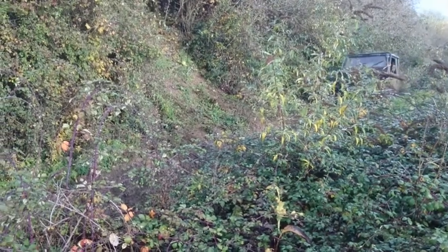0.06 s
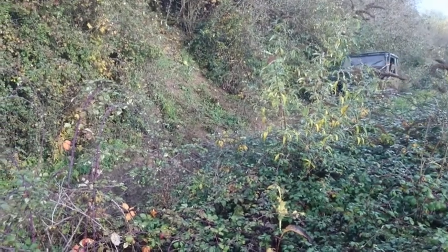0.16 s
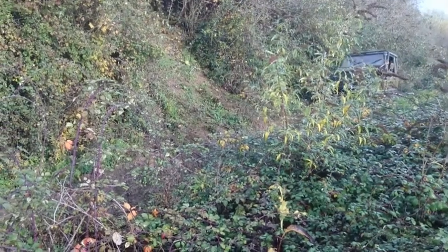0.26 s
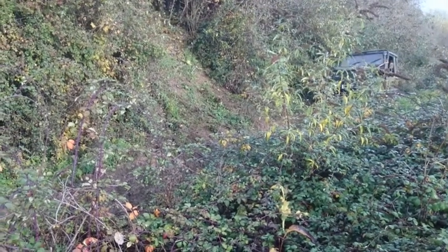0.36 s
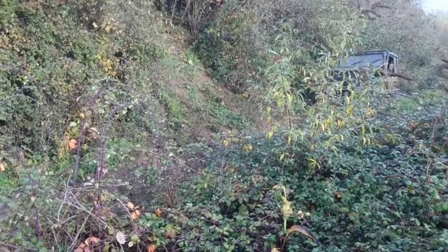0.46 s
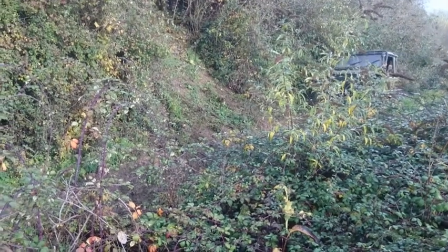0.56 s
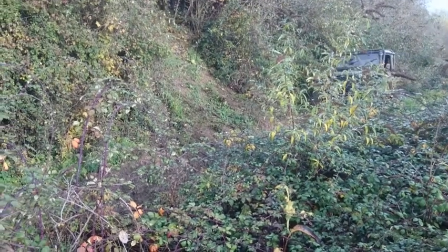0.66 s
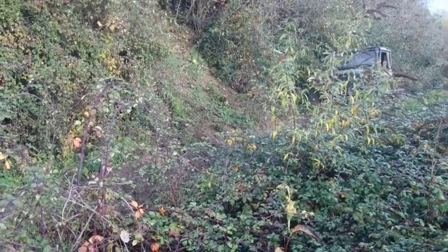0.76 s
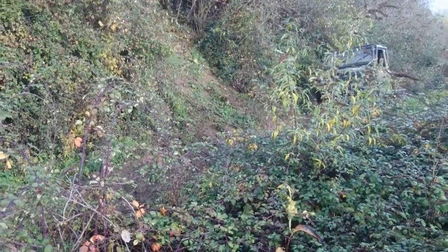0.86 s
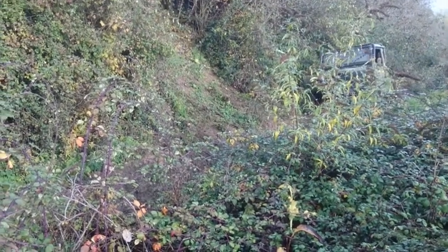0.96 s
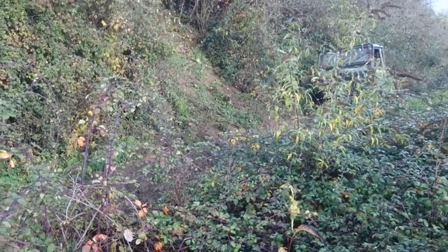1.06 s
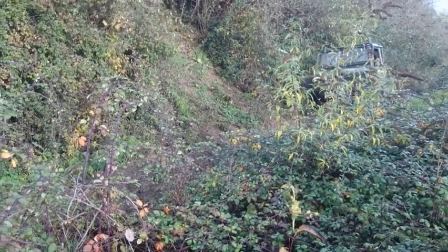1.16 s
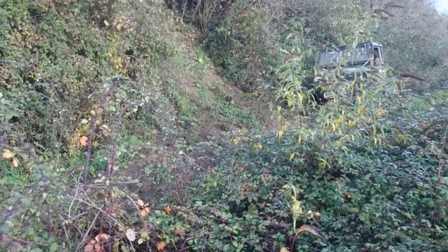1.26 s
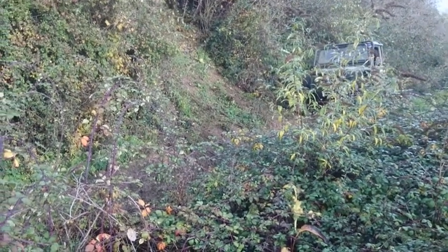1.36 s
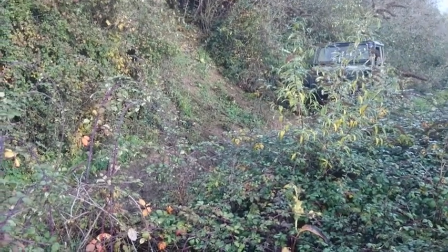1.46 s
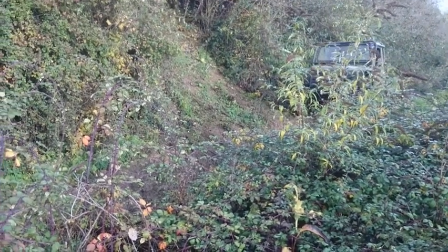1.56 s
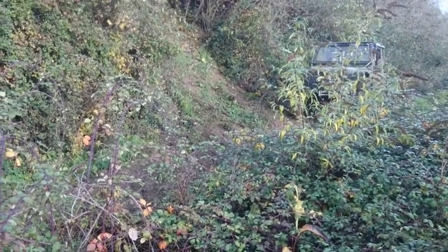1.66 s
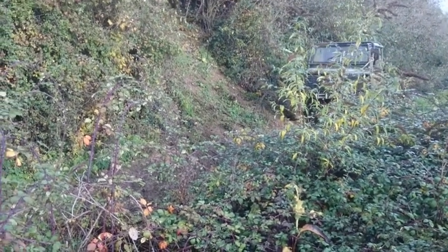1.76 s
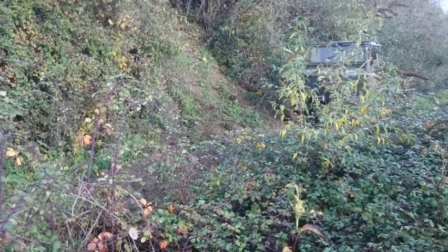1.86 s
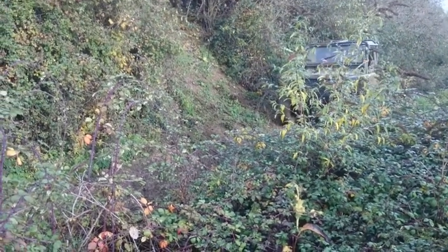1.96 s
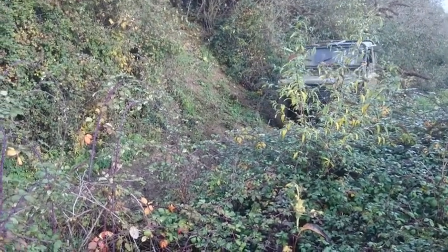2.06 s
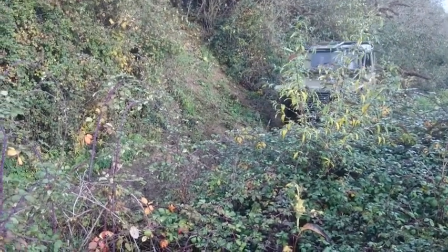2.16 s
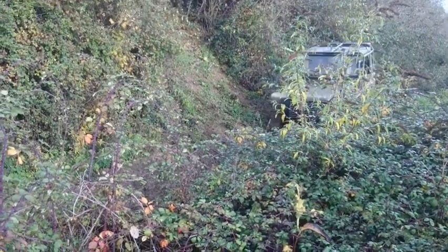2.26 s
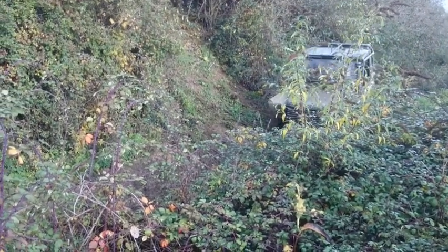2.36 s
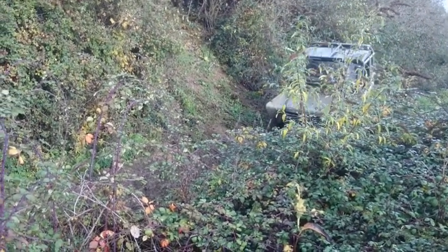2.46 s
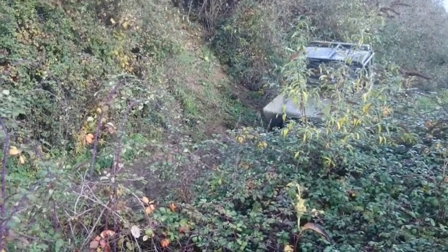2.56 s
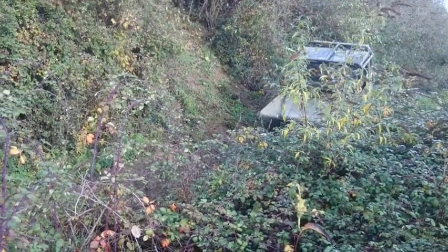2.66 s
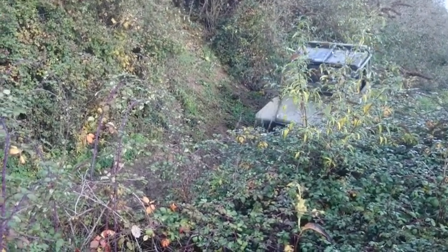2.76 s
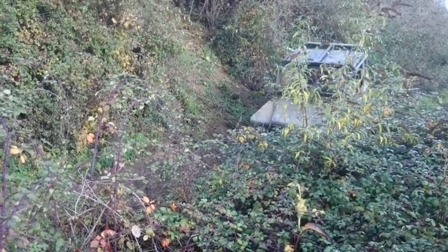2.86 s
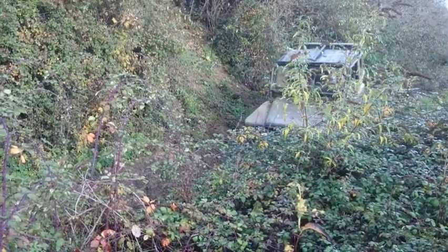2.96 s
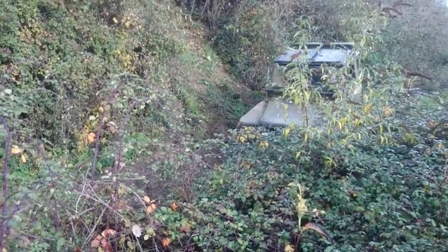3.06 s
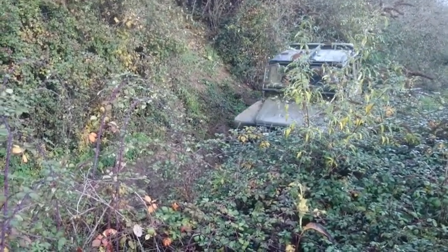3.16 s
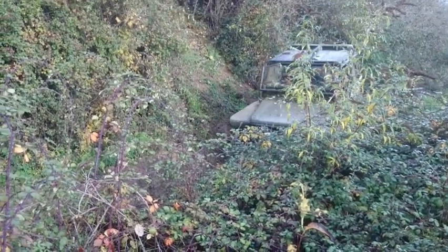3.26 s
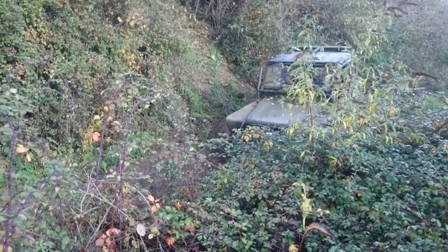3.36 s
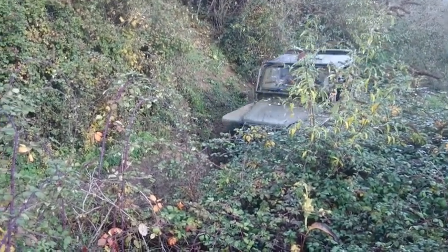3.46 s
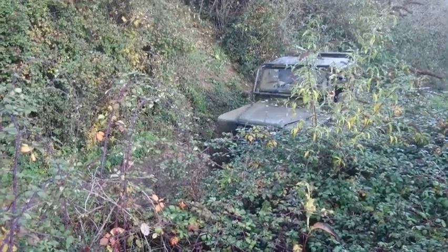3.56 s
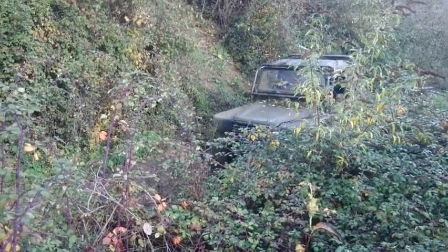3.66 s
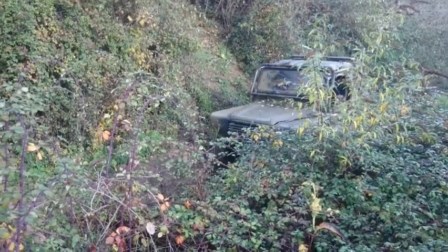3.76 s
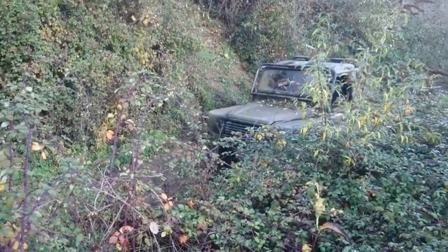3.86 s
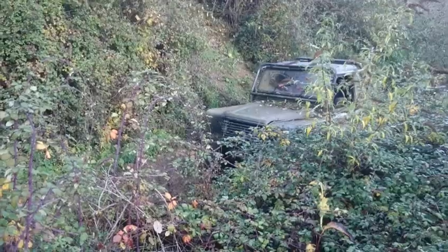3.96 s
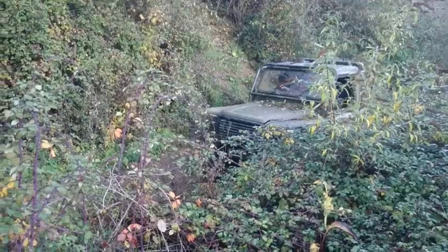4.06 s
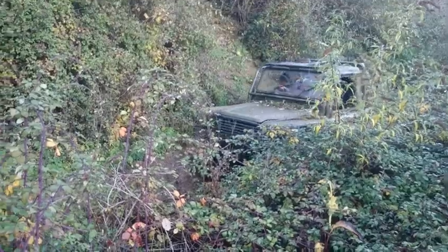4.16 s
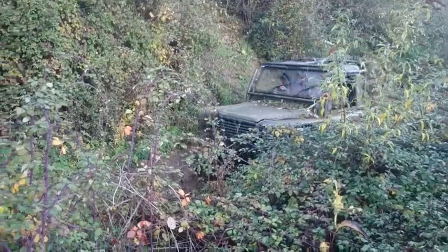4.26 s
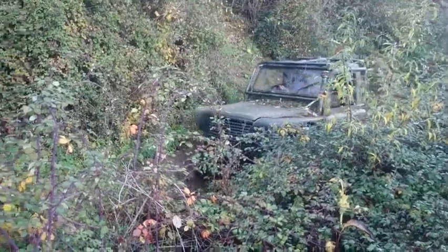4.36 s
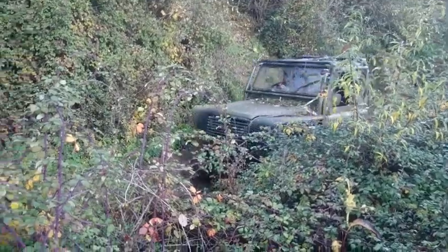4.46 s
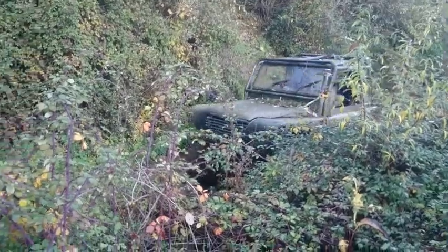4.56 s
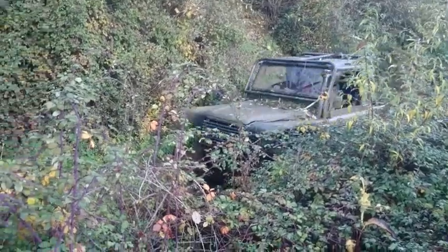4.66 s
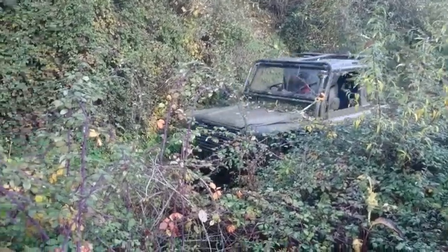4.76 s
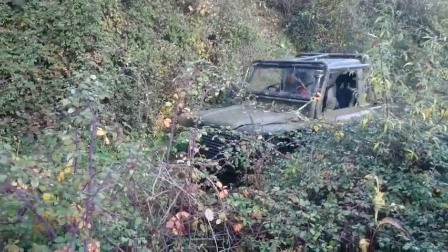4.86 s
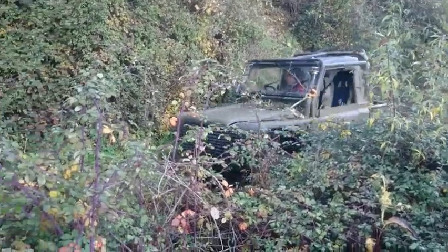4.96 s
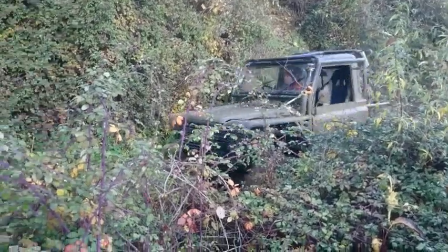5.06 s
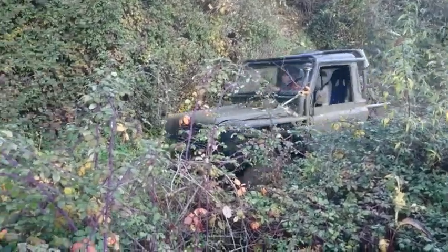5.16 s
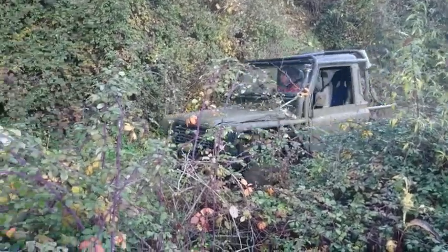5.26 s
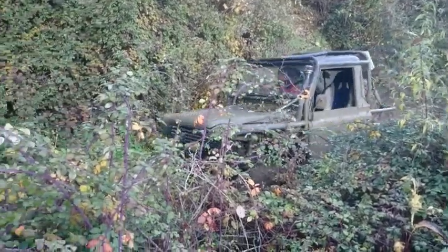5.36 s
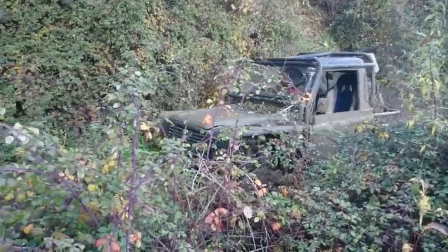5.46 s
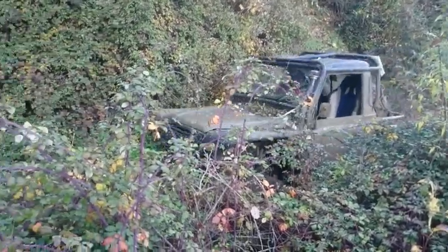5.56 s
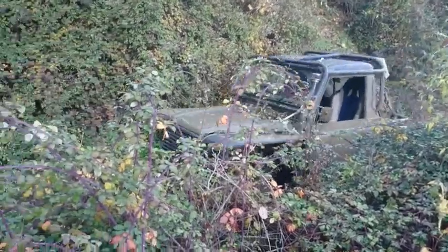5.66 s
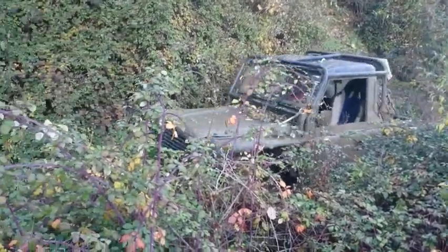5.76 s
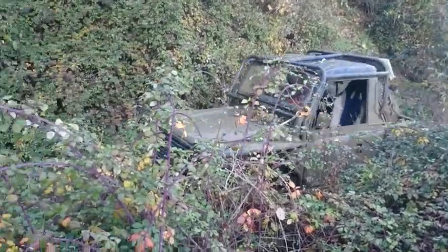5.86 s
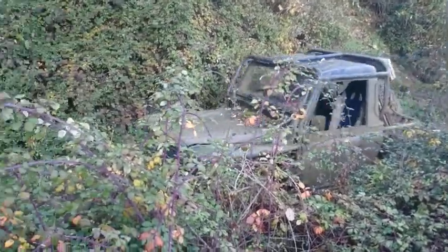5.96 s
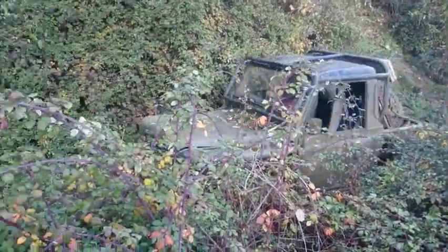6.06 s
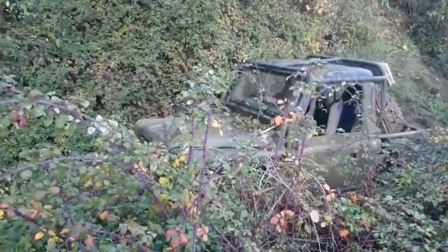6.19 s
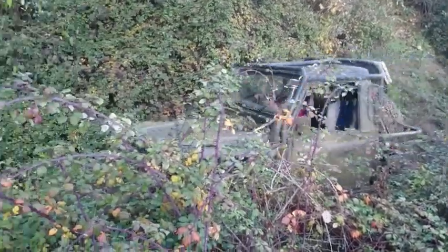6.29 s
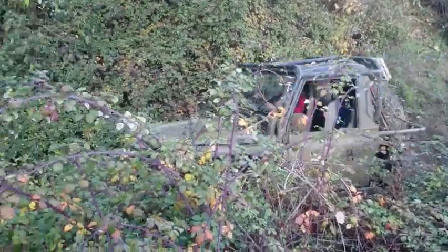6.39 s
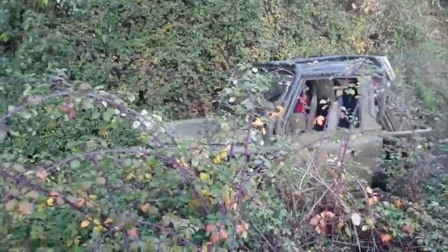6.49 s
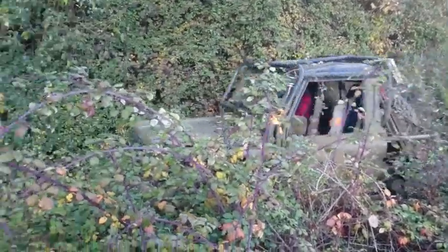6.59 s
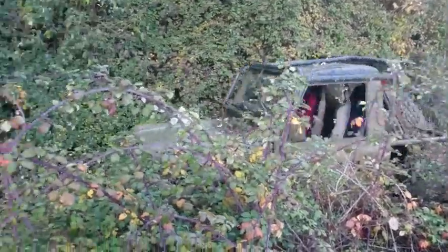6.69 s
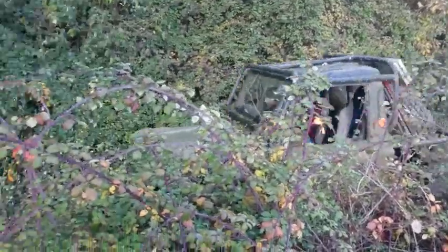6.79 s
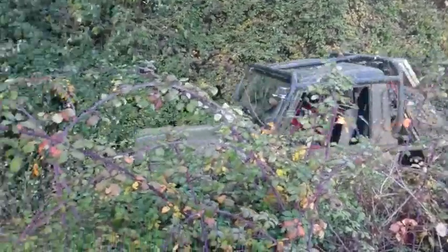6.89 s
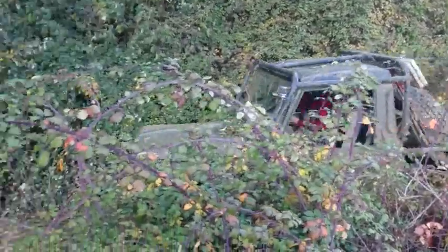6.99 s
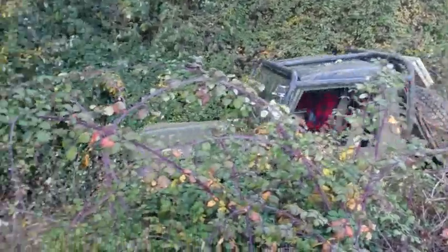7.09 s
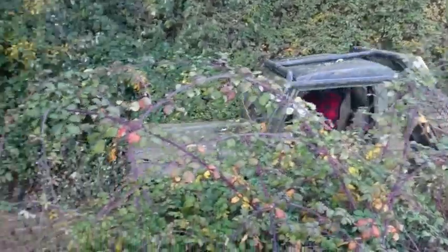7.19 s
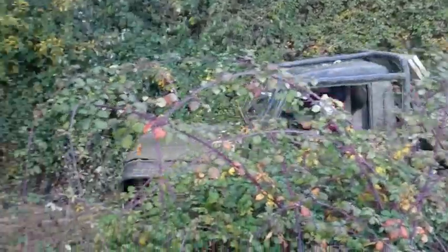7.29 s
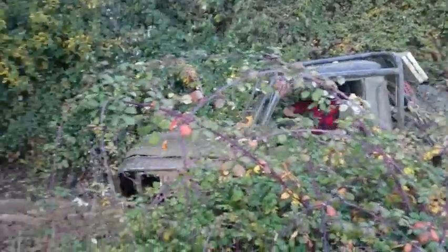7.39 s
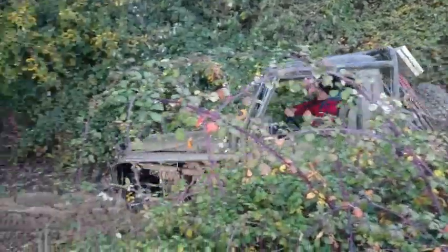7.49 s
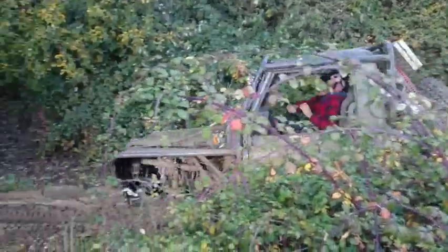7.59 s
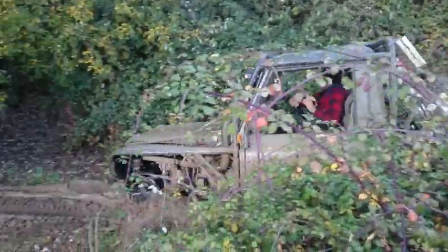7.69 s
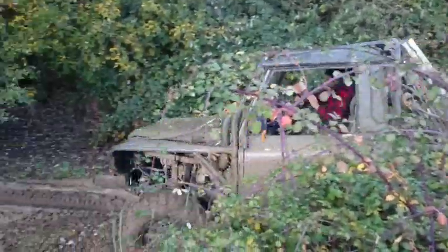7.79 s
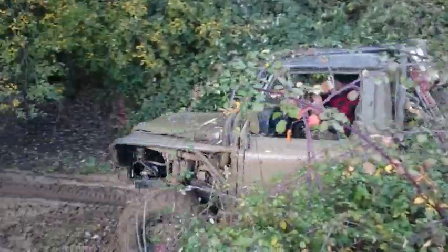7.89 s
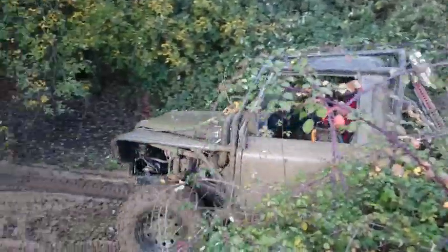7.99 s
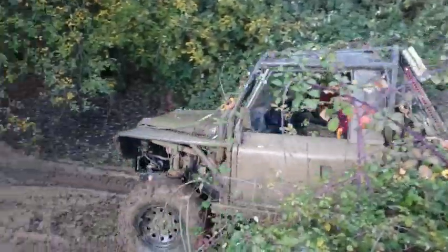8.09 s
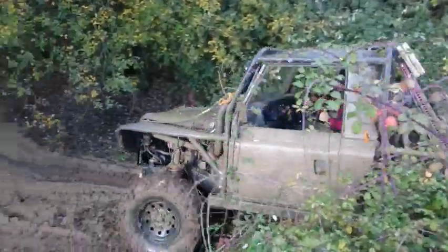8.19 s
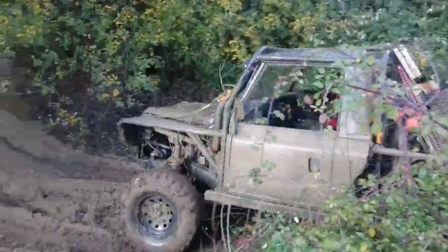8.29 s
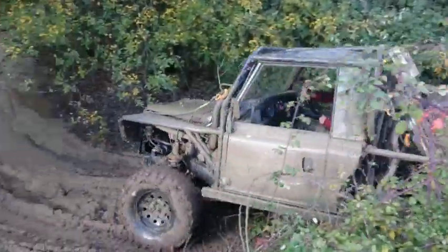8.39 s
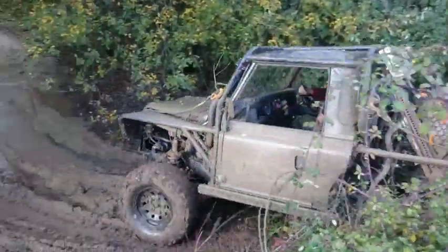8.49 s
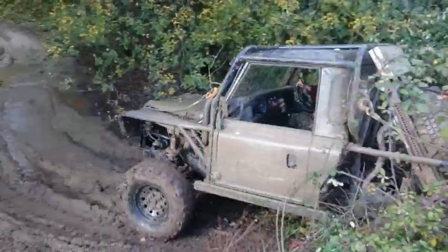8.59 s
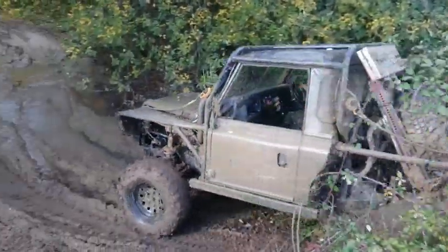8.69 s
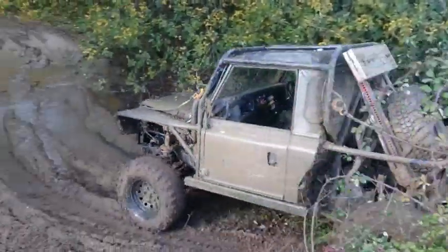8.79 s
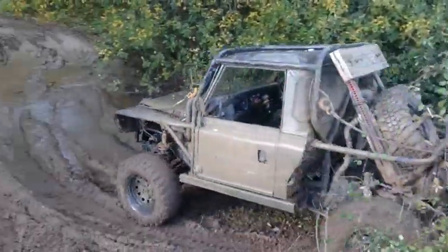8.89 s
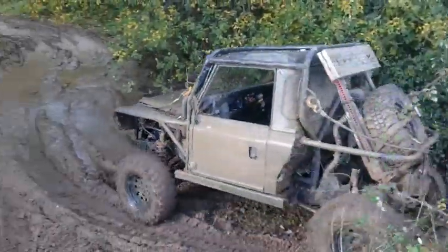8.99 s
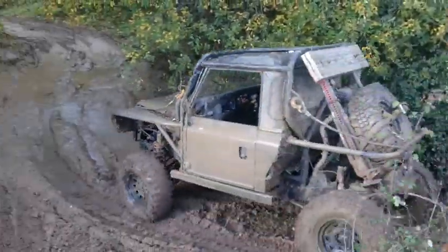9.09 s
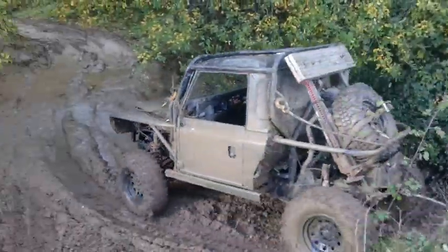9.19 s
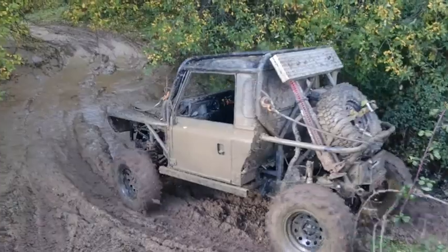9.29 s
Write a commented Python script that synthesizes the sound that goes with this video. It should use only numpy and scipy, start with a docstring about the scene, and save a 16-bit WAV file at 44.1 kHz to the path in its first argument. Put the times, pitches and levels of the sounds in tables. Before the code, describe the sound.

An off-road truck crawls through mud and bushes outdoors, its diesel engine clattering and humming. The engine eases off, then knocks harder as it comes closer and speeds up. Leaves hiss along the body and tyres rumble low under a faint gear whine. Brief high squeaks and sharp cracks break in, the two loudest cracks landing with chassis thuds in the second half. The truck ends close to the microphone, at its loudest.

```python
"""A clattering, humming diesel engine comes first: an off-road truck crawls closer through brush and
mud, then turns its side to us. Burning fuel knocks in the cylinders and rings the engine block,
the exhaust puffs, gears whine and the turbo hisses. Tyres rumble, leaves brush the body and the
chassis thuds, among sharp cracks, small ringing knocks and thin, high squeaks. Two close microphone
openings (ports) hear the bass in opposite phase: one wave rises as the other falls."""
import sys
import numpy as np
from scipy import signal
from scipy.fft import rfft, irfft, next_fast_len
from scipy.io import wavfile
from scipy.ndimage import uniform_filter1d

SR = 44100
rng = np.random.default_rng(int(sys.argv[2]) if len(sys.argv) > 2 else 0)


def int16_out(signal):
    """Quantize to a 16-bit WAV file."""
    q = np.round(np.clip(np.atleast_2d(signal).T, -1, 1) * 32767)
    wavfile.write(sys.argv[1], SR, q.astype(np.int16))


N = 411894
T = np.arange(N) / SR
SIZE = next_fast_len(N)
HZ = np.maximum(np.fft.rfftfreq(SIZE, 1 / SR), 1)


def undb(db):
    return 10 ** (np.asarray(db) / 20)


def unit(x):
    return x / np.sqrt(np.mean(x ** 2))


def curves(table):
    """Join a table's points in time: one curve for each value column."""
    times, *columns = np.transpose(table)
    return [np.interp(T, times, column) for column in columns]


def over_hz(table):
    """Join a table's points from low to high frequency."""
    hz, value = np.transpose(table)
    return np.interp(np.log(HZ), np.log(hz), value)


def shape(x, gain):
    """Filter a sound: give each frequency its own gain."""
    return irfft(rfft(x, SIZE) * gain, SIZE)[..., :N]


def hiss(gain):
    """Two unrelated noises with the same tone colour."""
    return unit(shape(rng.standard_normal((2, N)), gain))


def band(low_hz, high_hz):
    return 1 / np.sqrt((1 + (low_hz / HZ) ** 6) * (1 + (HZ / high_hz) ** 6))


def resonances(modes):
    """A filter that rings like a struck object."""
    return sum(undb(db) / (1 + 1j * (HZ - hz) / (width / 2)) for hz, width, db in modes)


def wander(rate):
    """A smooth random curve, roughly -1 to 1, with `rate` new values a second."""
    hold = int(SR / rate)
    steps = np.repeat(rng.standard_normal(N // hold + 1), hold)
    return 1.18 * uniform_filter1d(uniform_filter1d(steps, hold), hold)[:N]


def strike(start, rise, fade):
    """Loudness of a hit: a quick rise, then a fall of 60 dB every `fade` seconds."""
    swell, i = np.zeros(N), int(start * SR)
    t = np.arange(min(int(1.5 * fade * SR), N - i)) / SR
    swell[i:i + len(t)] = (1 - np.exp(-t / rise)) * np.exp(-np.log(1000) * t / fade)
    return swell / swell.max()


def tone(start, hz, drift=np.zeros(N)):
    """Half a second of a pure tone; drift is in cycles."""
    out, on = np.zeros(N), slice(int(start * SR), int((start + .5) * SR))
    out[on] = np.sin(2 * np.pi * (hz * (T[on] - start) + drift[on]))
    return out


def glide(hz):
    return np.sqrt(2) * np.sin(2 * np.pi * np.cumsum(hz) / SR)


# Turbo hiss, one list for each spell (time [s], pitch [Hz], level [dB])
TURBO_SPELLS = [
    [(0, 8500, -61.5), (0.6, 8600, -60), (1.1, 8350, -62), (1.55, 8250, -68)],
    [(2.15, 4150, -65), (2.4, 4350, -56), (2.7, 4350, -55), (2.9, 4200, -72)],
]
def turbo():
    """Air rushes through the turbine: a narrow hiss on a gliding pitch."""
    out = 0
    for spell in TURBO_SPELLS:
        hz, db = curves(spell)
        on = (T >= spell[0][0]) & (T < spell[-1][0])
        out = out + on * undb(db) * hiss(1 / (1 + (HZ / 240) ** 2)) * glide(hz)
    return out


# Loudness of the tyres (time [s], level [dB])
MUD_LEVEL = [(0, -50), (1.5, -44.5), (2.1, -56), (3, -57), (4.3, -46.5), (5.5, -46), (6.8, -43.5),
             (7.9, -39.5), (8.5, -44.5), (9.34, -39)]
# Their tone colour (frequency [Hz], level [dB])
MUD_COLOUR = [(15, -36), (25, -23), (43, -3), (60, -2.5), (100, -1.5), (140, -4), (200, -10.5),
              (260, -11.5), (440, -120)]
def mud():
    """Tyres roll through mud with a low, uneven rumble."""
    return undb(curves(MUD_LEVEL)[0] + 2 * wander(6)) * hiss(undb(over_hz(MUD_COLOUR)))


# Loudness as the truck works (time [s], clatter [dB], exhaust growl [dB], leaves [dB])
EFFORT = [(0, -42.5, -49.5, -51), (.5, -39.5, -47, -49), (.75, -40, -48.5, -53), (1.43, -38, -46, -51.5),
          (2, -43, -50.5, -55.5), (2.39, -40.5, -48, -53.5), (2.57, -40, -47, -47.5),
          (2.78, -43, -47.5, -55.5), (3.07, -42.5, -51, -57.5), (3.6, -39.5, -47.5, -52.5),
          (3.98, -37, -44, -52), (4.8, -37, -43, -49), (5.04, -34.5, -44, -44.5), (5.44, -34, -41, -46.5),
          (6.01, -35.5, -43.5, -46), (6.5, -30, -39.5, -45), (6.95, -27.5, -35.5, -43.5),
          (7.6, -28.5, -32, -42), (7.9, -28, -33, -37.5), (8.4, -26.5, -35, -38.5),
          (8.9, -27, -31.5, -37.5), (9.34, -23, -30.5, -35.5)]
# Tone colour of the leaves (frequency [Hz], level [dB])
LEAF_COLOUR = [(2060, -6.5), (3500, -1), (3970, -6), (4340, -6), (5060, -8), (6490, -3), (11200, -8),
               (12400, -15), (15100, -17.5), (16000, -46)]
def brush():
    """Leaves hiss along the body; twigs tick at random, about 90 times a second."""
    ticks = (rng.random(N) < 90 / SR) * undb(np.minimum(5.4 * rng.exponential(size=N), 9))
    ticks = signal.lfilter([1], [1, -np.exp(-1 / (.0024 * SR))], ticks)
    level = undb(curves(EFFORT)[2] + .9 * wander(12))
    return level * (1 + .12 * ticks) * hiss(undb(over_hz(LEAF_COLOUR)))


# Thin squeaks (time [s], level [dB], pitch [Hz], added octave [relative dB])
SQUEAK_EVENTS = [(0.4025, -52, 6350, 4), (1.526, -40, 5960, -5), (2.127, -41, 5722, -13),
                 (3.788, -40, 6170, -4), (4.598, -41, 6228, -9), (4.603, -39.5, 5784, -5),
                 (5.589, -31, 5880, -2), (6.053, -37.5, 5647, -0.5), (6.607, -26, 5970, -1.5),
                 (6.618, -32, 6240, -10), (6.63, -32, 6460, -10), (7.029, -38, 6300, -4),
                 (7.031, -27, 5888, -2), (7.72, -31.5, 6150, -5)]
def squeaks(fade_s=.14):
    """Slipping contact makes pitch and level tremble; the slope throws back an echo."""
    tremble = np.cumsum(50 * wander(400) + 15 * wander(30)) / SR
    low_rasp, high_rasp = (.78 + .6 * hiss(band(1, hz)) for hz in (140, 220))
    low, high = np.zeros((2, N))
    for start, db, hz, octave_db in SQUEAK_EVENTS:
        echo = undb(-12) * strike(start, .04, 2.2 * fade_s)
        swell = undb(db - 5.5) * (strike(start, .006, fade_s) + echo)
        low += swell * tone(start, hz, tremble)
        high += undb(octave_db) * swell * tone(start, 2 * hz, 2 * tremble)
    return low_rasp * low + high_rasp * high


# Bumps on the chassis (time [s], level [dB], pitch [Hz], fade [s])
CHASSIS_THUDS = [(2.31, -42, 792, 0.049), (5.493, -26, 451, 0.2), (5.504, -25, 474, 0.21),
                 (5.5, -29, 856, 0.25), (5.5, -38, 1067, .15), (5.51, -34, 240.6, 0.1),
                 (5.512, -26, 180, .12), (7.972, -24.5, 605, 0.089), (7.97, -18, 563, 0.073),
                 (7.994, -14, 409.6, 0.046), (8.046, -15, 265, 0.13), (8.068, -18, 300, 0.041)]
def thuds():
    """A panel rings briefly at a low pitch."""
    return sum(undb(db) * strike(start, .00099, fade) * tone(start, hz)
               for start, db, hz, fade in CHASSIS_THUDS)


# Sharp cracks and small ringing knocks (time [s], level [dB], body [relative dB],
# dull fizz [relative dB], bright fizz [relative dB], ring [relative dB], fade [s], ring pitch [Hz])
CRACK_EVENTS = [(1.999, -40.5, -10, 17.5, 18, -5, 0.018, 1819), (3.398, -20, -13, -16, 2, -6, 0.032, 2294),
                (3.404, -34.5, -10, -11, 1, -6, 0.19, 1897), (4.36, -20.5, -30, -24, -20, 4, 0.032, 1850),
                (4.384, -38, -23, -36, -32, -3, 0.053, 1820), (5.492, -3, -10, -19, -10, 5, 0.069, 1830),
                (5.524, -22.5, -1, -12, -10, 5, 0.27, 1660), (6.608, -23, -15, -9, -9, 6, 0.037, 1800),
                (7.249, -43, -9, 2, 10, -.5, 0.066, 1820), (7.949, -14, -5, -12, -10.5, -1, 0.25, 1498),
                (7.964, -2.5, -5, -8, -15, 3, 0.06, 1960), (7.996, -27, -26, -26, -14, 18, 0.13, 1506),
                (9.329, -12.5, -1.5, -5, -0.5, -15, 0.056, 1825)]
# Tone colour of a crack (pitch [Hz], width [Hz], level [dB])
CRACK_COLOUR = [(2160, 1100, -3), (3230, 760, -10.5), (1210, 95, -8)]
# Dull, then bright fizz (lowest [Hz], highest [Hz])
FIZZ_BANDS = [(4900, 6300), (7300, 8700)]
def cracks(full_echo_s=.051):
    """Sharp cracks and small ringing knocks; the bushes scatter an echo, weaker for short ones."""
    crack_noise = hiss(resonances(CRACK_COLOUR) * band(1500, 3500))
    body = hiss(band(130, 1500))
    rasp = 1.2 + .35 * hiss(band(1, 120))
    dull, bright = (1.34 * hiss(band(*edges) ** 2) for edges in FIZZ_BANDS)
    out = 0
    for start, db, body_db, dull_db, bright_db, ring_db, fade, hz in CRACK_EVENTS:
        echo = undb(-7.5) * min(fade / full_echo_s, 1) ** 2 * strike(start, .0065, 2.4 * fade)
        crack = (strike(start, .0052, fade) + echo) * crack_noise
        ring = undb(ring_db) * strike(start, .009, .55 * fade) * tone(start, hz) * rasp
        thump = undb(body_db) * (strike(start, .0014, 4.4 * fade) + echo) * body
        treble = undb(dull_db) * dull + undb(bright_db) * bright
        fizz = (strike(start, .0018, .5 * fade) + echo) * treble
        out = out + undb(db - 13) * (crack + ring + thump + fizz)
    return out


# An "order" is a pitch counted in cycles per turn of the engine's crankshaft.
# Gear teeth whining under load (order [per turn], start [s], end [s], level [dB])
GEAR_WHINES = [(27.2, 2.2, 2.92, -54.5), (27.26, 3.45, 4.3, -54.5), (27.23, 4.75, 5.05, -52),
               (27.23, 4.92, 5.6, -46), (27.23, 5.4, 6.4, -48), (29, 5.3, 6.2, -48.5),
               (24.15, 3.19, 4.6, -57.5), (24.1, 6.25, 7.15, -48.5), (22.6, 1.62, 1.88, -48.5),
               (25, 1.8, 2.02, -51), (27.2, 1.98, 2.2, -57), (17.2, 6.95, 7.4, -50), (24.15, 2.3, 2.8, -59),
               (30.6, 4.85, 5.4, -52), (13.7, 6.9, 8.8, -49), (17.07, 7.79, 9.6, -45.5),
               (29.6, 7.1, 7.95, -45)]
# Tones that stand out as the truck pulls away (same columns)
PULLING_TONES = [(6.2, 7.6, 9.6, -41), (4, 8.55, 9.1, -43), (1, 8.55, 9.6, -47), (4, 4.8, 7.2, -49),
                 (5, 8.7, 9.1, -41.5), (4.5, 8.95, 11, -35.5), (5.33, 8.95, 9.6, -37.5)]
def crank_tones(table, turns, flutter_db, wobble_rad, rate):
    """Tones that follow engine speed, fading in and out and wavering a little."""
    out = np.zeros(N)
    for order, start, end, db in table:
        on = slice(int(start * SR), int(end * SR))
        fade = np.clip(np.minimum(T[on] - start, end - T[on]) / .13, 0, 1)
        level = undb(db + flutter_db * (wander(rate) + wander(8))[on])
        phase = 2 * np.pi * order * turns[on] + wobble_rad * wander(rate)[on]
        out[on] += level * fade * np.sin(phase)
    return np.sqrt(2) * out


# Engine speed and hum (time [s], speed [turns/s], hum [dB])
ENGINE_SPEED = [(0, 47.9, -51), (.53, 50.7, -46.5), (.62, 50.5, -45.5), (.76, 45.97, -42.5),
                (.86, 46.3, -42.5), (1.13, 50.65, -46.5), (1.4, 45.77, -47.5), (1.62, 44.33, -43.5),
                (1.7, 43, -54), (1.8, 40.44, -63), (2.2, 33.34, -61), (2.42, 37.3, -61), (2.58, 38.07, -61),
                (2.95, 34.7, -66), (3.12, 35.5, -55), (3.35, 36.65, -52), (3.6, 36.6, -54),
                (3.87, 37.75, -50), (4.15, 37.68, -47), (4.6, 33.47, -45), (4.85, 33.27, -44),
                (5.05, 36.5, -42.5), (5.2, 37.3, -40), (5.36, 35.93, -39.5), (5.52, 31.58, -39),
                (5.65, 32.7, -39.5), (5.9, 33.02, -40), (6.1, 32.94, -39.5), (6.43, 39.53, -38.5),
                (6.7, 37.96, -38.5), (7.18, 43.3, -40), (7.86, 46.28, -42.5), (8.35, 46.03, -38.5),
                (8.6, 47.8, -33.5), (8.9, 47.97, -38.5), (9.34, 53.6, -41)]
# Hum from the back, front and side, a row each (order 1 [dB], ..., order 6 [dB])
HUM_ORDERS = [(0, 4, 1.5, -3.5, -11, -18), (0, -4.5, 0.92, -10.5, -5, 1), (0, 3.5, 1.8, -2.5, -11, -12)]
# How much the hum wavers (order 1 [dB], ..., order 6 [dB])
HUM_WAVER = [1.4, 1.3, 1.3, 2, 3.5, 4]
# What the silencer lets through (frequency [Hz], gain [dB])
SILENCER_GAIN = [(33, -30), (44, -25), (51, 3), (64, 3), (80, 1), (93, -8), (106, -13), (125, -1.5),
                 (142, -2), (160, -3), (195, -11.5), (230, -8), (285, -8), (320, 3)]
def exhaust_hum(turns, facing):
    """Six low tones, locked to the crankshaft, pass through the silencer."""
    speed, hum_db = curves(ENGINE_SPEED)
    out = 0
    for order, db, waver in zip(range(1, 7), np.transpose(HUM_ORDERS) @ facing, HUM_WAVER):
        silencer_db = np.interp(order * speed, *np.transpose(SILENCER_GAIN))
        level = undb(hum_db + db + silencer_db + waver * wander(9))
        out = out + level * np.sin(2 * np.pi * order * turns + .006 * order ** 3 * wander(25))
    return np.sqrt(2) * out


# Tone colour of the exhaust pipe (frequency [Hz], level [dB])
PIPE_COLOUR = [(88, -43), (150, -10), (173, -4), (292, 1), (458, -11), (614, -9.5), (692, -18), (900, -7),
               (1170, -32), (1980, -120)]
def exhaust_growl(progress, strength):
    """Each firing sends a sharp puff down the pipe, amid the rush of swirling gas."""
    pipe = undb(over_hz(PIPE_COLOUR))
    puffs = undb(-17.5) * unit(shape(strength * np.exp(-progress / .0071), pipe))
    gas = undb(-1.5 + 1.24 * wander(25)) * hiss(pipe)
    return undb(curves(EFFORT)[1]) * (puffs + gas)


# Tone colour of the clatter from three directions (frequency [Hz], level [dB])
BACK_COLOUR = [(290, -34), (500, -7), (714, -10), (786, -8.5), (991, -27), (1170, -1), (1330, -1.5),
               (1480, -5.5), (1620, 1), (1780, -3), (1950, -9), (2090, -0.5), (2230, -2), (2430, -18),
               (2620, -19), (2860, -15), (5000, -23), (6500, -38), (11000, -120)]
FRONT_COLOUR = [(290, -34), (500, -5), (771, -7.5), (981, 0.5), (1220, -1.5), (1490, -17.5), (1670, 3),
                (1890, -0.5), (2120, -16), (2430, -5), (2940, -9), (3270, -8), (3530, -13), (4450, -25),
                (5000, -49), (6500, -66), (11000, -120)]
SIDE_COLOUR = [(290, -29), (500, -32), (636, -6.5), (735, -6.5), (833, -14.5), (1020, -5), (1530, 1.5),
               (1720, -3.5), (1980, 2), (3970, -23.5), (5000, -24), (6500, -45), (11000, -120)]
def rattle(blows, facing):
    """Engine noise throbs with the firings and changes colour as the truck turns."""
    views = zip(facing, (BACK_COLOUR, FRONT_COLOUR, SIDE_COLOUR))
    noise = sum(np.sqrt(share) * hiss(undb(over_hz(colour))) for share, colour in views)
    return undb(-2) * unit(2.4 + blows) * noise


# Steady rings of the engine block (pitch [Hz], width [Hz], level [dB])
BLOCK_RINGS = [(1330, 50, 2), (1500, 70, -14), (1800, 37, 8.5), (2216, 51, 5.5), (2590, 91, 2),
               (3100, 24, 3.5)]
# Their level in the clatter (back [dB], front [dB], side [dB])
PING_LEVEL = [-13, -16, -11]
def block_ping(firing, strength, blows, facing):
    """Each burn rings the block, starting with a sharp tick that is early or late by chance."""
    block = resonances(BLOCK_RINGS) * band(1000, 3300)
    ping = unit(shape((.15 + blows ** 1.9) * rng.standard_normal((2, N)), block))
    starts = np.flatnonzero(np.diff(firing))
    jitter, push = rng.standard_normal((2, len(starts)))
    tick_at = np.clip(starts + (60 + 15 * jitter).astype(int), 0, N - 1)
    ticks = np.zeros(N)
    ticks[tick_at] = strength[starts + 1] ** 1.6 * np.sign(push)
    return undb(np.dot(PING_LEVEL, facing)) * (ping + undb(-1) * unit(shape(ticks, block)))


# Two sliding bands of clatter (time [s], low [Hz], middle [Hz], low [dB], middle [dB])
LOWER_BANDS = [(0, 1213, 1762, -9.5, -3), (1.5, 1196, 1801, -10.5, -6), (2.1, 1320, 1836, -9.5, -8.5),
               (3.6, 1327, 1840, -20, -7), (4.1, 1509, 1837, -6.5, -5.5), (5.8, 1541, 1937, -13.5, -15.5),
               (6.3, 1203, 1797, -9, -9.5), (7, 1280, 2020, -8, -8.5), (7.8, 1360, 2064, -4.5, -5),
               (8.5, 1501, 2041, -8, -11), (9.34, 1588, 2010, -7.5, -10)]
# A third, higher one (time [s], pitch [Hz], level [dB])
UPPER_BAND = [(0.0, 2335, -17), (0.93, 2277, -11), (1.01, 2446, -7), (1.11, 2290, -15), (3.16, 2375, -6.5),
              (3.86, 2350, -9), (6.68, 2494, -13), (7.33, 2312, -16), (9.14, 2360, -15), (9.22, 2548, -7),
              (9.3, 2302, -15)]
def sliding_bands(blows, spread_hz=80):
    """Three narrow bands of engine noise throb with the firings and glide in pitch."""
    low_hz, middle_hz, low_db, middle_db = curves(LOWER_BANDS)
    out = 0
    for hz, db in ((low_hz, low_db), (middle_hz, middle_db), curves(UPPER_BAND)):
        throb = (.82 + blows ** 1.25) * rng.standard_normal((2, N))
        narrow = unit(shape(throb, 1 / (1 + 1j * HZ / spread_hz)))
        out = out + undb(db) * narrow * glide(hz)
    return out


# The hardest burns (time [s], level [dB], low tone [relative dB], upper tone [relative dB])
HARD_KNOCKS = [(3.0709, -35, -10, 1), (3.0991, -34.5, -12, -4), (3.2121, -31, -8, -3),
               (3.2443, -33, -8, -4), (3.2951, -29.5, -8, -2), (3.3253, -28, -8, -4), (3.4394, -32, -6, -4),
               (3.5433, -30, -8, -1), (3.7617, -30, -8, -4), (3.8159, -29, -8, 0), (3.8735, -27, -8, -4),
               (3.9, -24, -10, -6), (3.925, -26, -8, -5), (3.9799, -24.5, -8, -5), (4.0299, -31, -8, -6),
               (4.3001, -25, -10, -3), (4.5026, -27, -4, -6), (4.593, -26, -11, -7), (5.1757, -22, -6, -8),
               (5.2835, -25, -5, -8), (5.3385, -25.5, -1, -4), (5.4255, -30, -8, -4), (5.9188, -26, -6, -6),
               (5.9808, -28, -6, -8), (6.4772, -23, -10, 0), (6.5276, -23.5, -8, 3), (6.8134, -20, -1, -6),
               (6.8681, -17, -3, -9), (6.9129, -20, -8, -8), (6.9925, -20, -5, -7), (7.0632, -22, -8, -8),
               (7.1311, -18.5, -6, -6), (7.177, -20, -8, -5), (7.2913, -20, -8, -7), (7.3816, -17, -2, -6),
               (7.5607, -25, -8, -4)]
def hard_knocks(rise_s=.0021, fade_s=.042):
    """A hard knock is a short crack plus three brief tones, pitched near the sliding bands."""
    pitches = curves(LOWER_BANDS)[:2] + curves(UPPER_BAND)[:1]
    t = np.arange(int(.1 * SR)) / SR
    swell = (1 - np.exp(-t / rise_s)) * np.exp(-np.log(1000) * t / fade_s)
    tones, crack = np.zeros((2, N))
    for start, db, low_db, upper_db in HARD_KNOCKS:
        i = int(start * SR)
        for hz, tone_db in zip(pitches, (low_db, 0, upper_db)):
            pitch = hz[i] * (1 + .015 * rng.standard_normal())
            tones[i:i + len(t)] += undb(db + tone_db) * swell * np.sin(2 * np.pi * pitch * t)
        crack[i:i + len(t)] += undb(db - 7.5) * swell ** 2
    return tones + crack * hiss(band(1200, 3200))


# Which part faces us (time [s], back [0-1], side [0-1]); the rest is the front
TRUCK_FACING = [(0, 1, 0.11), (1.5, 0.87, 0), (1.9, 0.56, 0.0), (3.7, 0, 0.58), (5.8, 0, 0.29),
                (6.6, 0.04, 0.64), (7.5, 0.12, 1), (9.34, 0.03, 0.64)]
# Knock from the back, front and side, a row each (cylinder 1 [dB], ..., cylinder 4 [dB])
CYLINDER_LEVELS = [(0, -3.5, -1.4, -6), (0, -9.5, -0.37, -10), (0, -7.5, -2, -20)]
def engine(flywheel_s=.12):
    """Four cylinders fire, two each turn. They knock unequally, so the clatter throbs."""
    speed = uniform_filter1d(curves(ENGINE_SPEED)[0], int(flywheel_s * SR), mode="nearest")
    turns = np.cumsum(speed) / SR
    back, side = np.clip(curves(TRUCK_FACING), 0, 1)
    facing = [back, np.clip(1 - back - side, 0, 1), side]
    hum = exhaust_hum(turns, facing)
    whine = crank_tones(GEAR_WHINES, turns, flutter_db=1.6, wobble_rad=.7, rate=40)
    pull = crank_tones(PULLING_TONES, turns, flutter_db=1.2, wobble_rad=.3, rate=20)
    firing = (2 * turns).astype(int)  # counts the firings
    progress = 2 * turns % 1  # runs from 0 to 1 between firings
    cylinder_db = np.choose(firing % 4, np.transpose(CYLINDER_LEVELS) @ facing)
    strength = undb(cylinder_db + .8 * rng.standard_normal(N // 200)[firing])
    blows = strength * np.sin(np.pi * progress ** .7) ** 2
    clatter = rattle(blows, facing) + block_ping(firing, strength, blows, facing) + sliding_bands(blows)
    growl = exhaust_growl(progress, strength)
    return hum + whine + pull + growl + undb(curves(EFFORT)[0]) * clatter + hard_knocks()


# How much louder the left port is (frequency [Hz], left minus right [dB])
LEFT_LEVEL = [(60, 0), (110, -5), (200, -7), (380, -10), (700, -9.5), (1290, -10.5), (2380, -13.5),
              (4400, -4), (8120, 4), (11000, -3.5), (15000, -14.5)]
# How alike the ports sound (frequency [Hz], likeness [0-1])
PORT_LIKENESS = [(60, 0.98), (300, 0.99), (700, 0.88), (1400, 0.68), (2300, 0.6), (3500, 0.3), (16000, 0.1)]
# How far the left wave runs ahead of the flipped right one (frequency [Hz], lead [radians])
LEFT_LEAD = [(60, 0.44), (300, 0.52), (1100, 0.16), (1900, 1.27), (2600, 1.75), (16000, -0.47)]
def ports(first, second):
    """The right port faces the truck; the left gets its bass upside down and mostly its own treble."""
    left_gain, lead = undb(over_hz(LEFT_LEVEL)), over_hz(LEFT_LEAD)
    alike = np.clip(over_hz(PORT_LIKENESS), 0, 1)
    # keeps the average of the two ports at the level that came in
    gain = 2 / np.sqrt(1 + left_gain ** 2 - 2 * alike * left_gain * np.cos(lead))
    flipped = shape(first, -alike * left_gain * gain * np.exp(1j * lead))
    own = shape(second, np.sqrt(1 - alike ** 2) * left_gain * gain)
    return np.array([flipped + own, shape(first, gain)])


def scene():
    """All the sources together, heard at the two ports."""
    return ports(*(engine() + mud() + turbo() + brush() + squeaks() + thuds() + cracks()))


def record(dry, top_hz=15800):
    """Round off the loudest peaks and cut the highest treble."""
    treble_cut = signal.ellip(10, .2, 70, top_hz, fs=SR, output="sos")
    return signal.sosfilt(treble_cut, np.tanh(.94 * dry) / 1.215)


dry = scene()
out = record(dry)
int16_out(out)
```